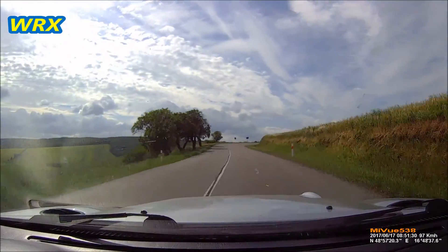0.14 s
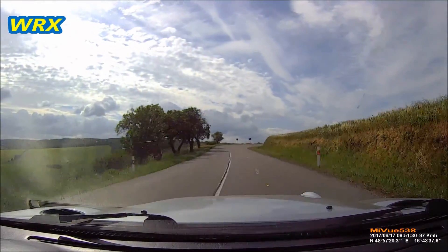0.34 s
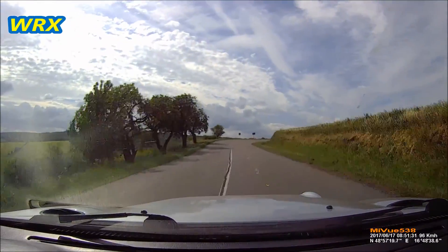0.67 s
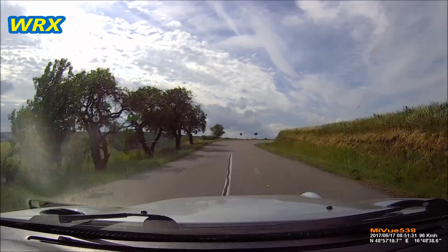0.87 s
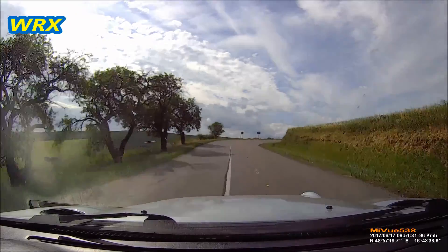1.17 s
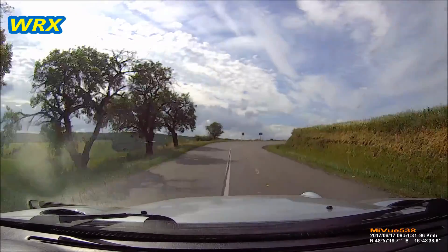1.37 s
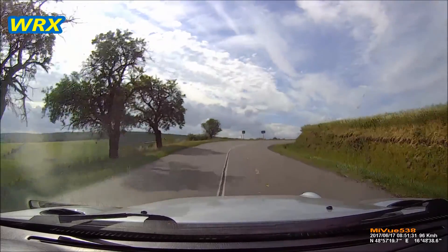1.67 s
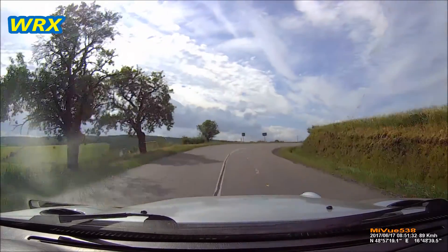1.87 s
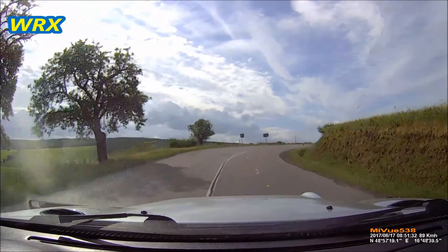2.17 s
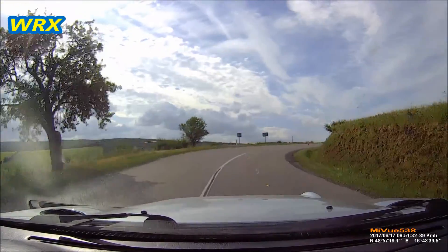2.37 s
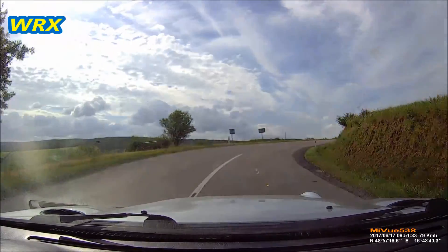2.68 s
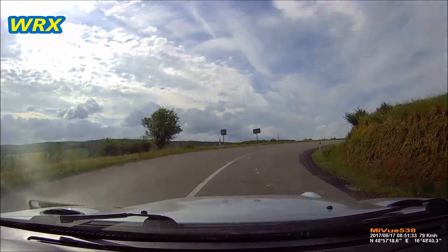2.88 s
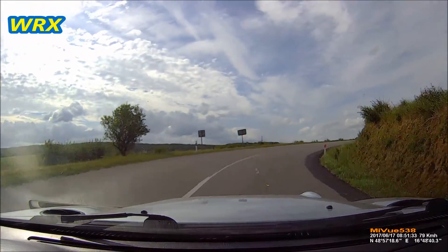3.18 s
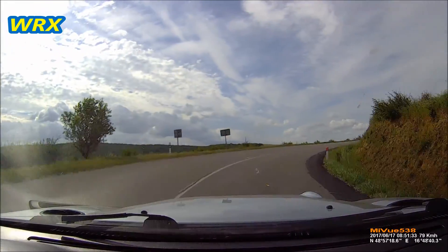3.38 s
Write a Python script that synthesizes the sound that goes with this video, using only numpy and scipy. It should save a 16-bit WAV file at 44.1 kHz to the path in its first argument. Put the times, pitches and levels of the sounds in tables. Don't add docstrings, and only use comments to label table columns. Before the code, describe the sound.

A car engine drones low inside a slowing cabin, with an early air hiss and trim rattles.

```python
import sys
import numpy as np
from scipy import signal
from scipy.fft import rfft, irfft, next_fast_len
from scipy.io import wavfile
from scipy.ndimage import uniform_filter1d, map_coordinates

SR = 44100
rng = np.random.default_rng(int(sys.argv[2]) if len(sys.argv) > 2 else 0)


def dump(signal):
    limited = np.clip(np.atleast_2d(signal).T, -1, 1)
    pcm = np.round(limited * 32767).astype(np.int16)
    wavfile.write(sys.argv[1], SR, pcm)


def natural_amplitude(level_db):
    exponent = np.asarray(level_db, float) / 20
    return 10 ** exponent


N = 156114


def unit(x):
    return x / np.sqrt(np.mean(x ** 2) + 1e-20)


def along(points, hz):
    f, v = np.transpose(points)
    return np.interp(np.log(hz + 1), np.log(f + 1), v)


def curves(rows):
    s, *cols = np.transpose(rows)
    return [np.interp(np.arange(N) / SR, s, c) for c in cols]


def wobble(rate):
    return map_coordinates(rng.standard_normal(1000), [np.arange(N) * rate / SR])


def filtered(x, response):
    m = next_fast_len(len(x) + 8192)
    return irfft(rfft(x, m) * response(np.fft.rfftfreq(m, 1 / SR)), m)[:len(x)]


def ringing(peaks, hz):
    return sum(natural_amplitude(db) * hz * w / np.hypot(c * c - hz * hz, hz * w + 1) for c, w, db in peaks)


def rush(response, patchy_db):
    z = signal.stft(rng.standard_normal(N + 512), nperseg=512)[2]
    field = rng.standard_normal(z.shape)
    field = uniform_filter1d(uniform_filter1d(field, 6, 0), 12, 1)
    patchy = signal.istft(z * natural_amplitude(patchy_db * unit(field)), nperseg=512)[1][:N]
    return unit(filtered(patchy, response))


def octave_band(f, hz, octaves):
    return np.exp(-np.log2((f + 1) / hz) ** 2 / octaves ** 2)


def road():
    # pitch_hz, level_db (per Hz)
    tyre_wind = [(250, -10), (330, -7.5), (550, -14.5), (900, -19.5), (2000, -31), (2900, -44), (4500, -50),
                 (7000, -55.5)]
    # pitch_hz, width_hz, level_db
    panels = [(286.6, 27, 1), (367.4, 18, 2.5), (553.6, 26, 2.5), (790, 30, 3), (1074, 27, -2.5),
              (2100, 800, -8.5), (6900, 610, 6)]
    # pitch_hz, level_db (per Hz)
    low_thrum = [(15, -16.5), (30, 0), (60, -7.5), (130, 0), (200, -10), (400, -20.5)]
    cancelled = [(336, 9.5, 0)]

    def body_response(hz):
        colour = natural_amplitude(along([(140, -42.5)] + tyre_wind + [(16500, -71.5)], hz))
        return colour * (1 + 0.78 * ringing(panels, hz)) * (1 - 0.6 * ringing(cancelled, hz))

    def thrum_response(hz):
        return natural_amplitude(along([(5, -61)] + low_thrum + [(900, -89.5)], hz))

    body = rush(body_response, patchy_db=-0.06)
    thrum = rush(thrum_response, patchy_db=-1.5)
    fade_db = -1.54 * (np.arange(N) / SR - 1.8)
    body_db = -32.5 + fade_db + 0.98 * wobble(3.715) + 0.22 * wobble(30.5)
    return natural_amplitude(body_db) * body + natural_amplitude(-29.5 + 0.36 * wobble(6)) * thrum


def trim_buzz():
    band = rush(lambda f: octave_band(f, 6900, 0.63), patchy_db=1.5)
    return natural_amplitude(-73 + 2.5 * wobble(45)) * band


def rattles():
    # start_s, peak_db
    clicks = [(0.6394, -52), (1.504, -40.5), (1.5654, -39), (1.7005, -50), (1.7692, -45), (1.8594, -46),
              (2.058, -42), (2.1658, -40), (2.175, -32), (2.3516, -37.5), (2.3715, -39.5), (2.4446, -37.5),
              (2.645, -43), (2.6534, -39), (2.8036, -37.5), (2.9757, -47), (3.1003, -29.5), (3.3762, -46)]
    # pitch_hz, width_octaves, t60_s
    colours = [(4500, 0.97, 0.021), (5000, 1.2, 0.041), (5600, 0.71, 0.021), (6000, .6, .05),
               (5900, 0.83, 0.13), (6200, 0.85, 0.11), (5000, 0.88, 0.025), (5600, 0.96, 0.019),
               (5600, .6, 0.019), (2332, 0.4, 0.047), (6700, .5, 0.045), (1898, 0.88, 0.031),
               (3600, 0.35, 0.034), (2980, 0.49, 0.064), (5170, 2.6, 0.028), (4320, 0.53, 0.033),
               (5100, .8, 0.051), (6600, 0.22, .07)]
    # start_s, peak_db
    linkage = [
        (2.8041, -40),
        (3.1002, -33),
    ]
    # pitch_hz, level_db, t60_s
    lever = [(2030, 0.5, 0.043), (2250, -7.5, .04), (4318, -12, .04), (4800, -9, 0.035), (6860, -7, 0.026)]
    # start_s, level_db, pitch_hz
    thumps = [
        (.19, -24, 290),
        (.22, -25, 200),
        (2.335, -22, 285),
        (2.65, -22, 370),
        (2.65, -28, 525),
        (3.10, -23, 303),
    ]
    out, t = np.zeros(N + SR), np.arange(SR // 5) / SR

    def add(start_s, sound):
        out[round(start_s * SR):][:len(t)] += sound

    for (s, db), (pitch_hz, octaves, t60_s) in zip(clicks, colours):
        def contact(f):
            return octave_band(f, pitch_hz, octaves) + natural_amplitude(-13.5) * (f > 1200)

        burst = unit(filtered(rng.standard_normal(len(t)), contact))
        hard = db > -40
        decay = natural_amplitude(-60 * t / t60_s) + hard * natural_amplitude(1.5 - 60 * t / 0.007)
        rise = 1 - np.exp(-t / (0.0003 if hard else 0.003))
        add(s, natural_amplitude(db - 7) * decay * burst * rise)
    for s, db in linkage:
        ring = np.zeros(len(t))
        for hz, level_db, t60_s in lever:
            struck_db = level_db + rng.normal(0, 1.5)
            ring += natural_amplitude(struck_db - 60 * t / t60_s) * np.sin(2 * np.pi * hz * t)
        add(s, natural_amplitude(db + 1.5) * ring)
    for s, db, hz in thumps:
        swell = natural_amplitude(db - 60 * t / 0.2) * (1 - np.exp(-t / 0.012))
        add(s, swell * np.sin(2 * np.pi * hz * t))
    return out[:N]


def mount():
    # start_s, peak_db
    ticks = [
        (1.6289, -43),
        (3.091, -53.5),
    ]
    out = np.zeros(N)
    for s, db in ticks:
        out[round(s * SR):][:2] += natural_amplitude(db + 10.5) * np.array([1, -1])
    return out


def gearbox():
    # time_s, pitch_hz, level_db
    hum = [(2.2, 352.6, -45), (2.6, 330, -41.5), (2.9, 317.3, -38.5), (3.15, 294, -43), (3.54, 282, -42)]
    hz, db = curves(hum)
    phase = 2 * np.pi * np.cumsum(hz) / SR + 0.49 * wobble(17)
    return np.sqrt(2) * natural_amplitude(db + 2.3 * wobble(18)) * np.sin(phase)


def boost_air():
    # time_s, pressure_db
    pressure = [(0, -28.5), (.12, -30), (.33, -35), (.4, -36.5), (.82, -42.5), (1.5, -49), (2.2, -51.5),
                (3.2, -70), (3.54, -56)]
    # pitch_hz, level_db (per Hz)
    hiss = [(700, -18.5), (1300, -7.5), (1700, -7), (2100, -5.5), (2700, -8.5), (4400, -15), (6900, -18.5),
            (9000, -32)]
    # pitch_hz, width_hz, level_db
    duct = [(1620, 30, -3), (1725, 32, 0), (2015, 60, 4.5), (2200, 35, -2), (2280, 20, -1), (2490, 40, -4),
            (2783, 28, -1), (3078, 35, -2), (3315, 28, 0), (4197, 25, 1)]
    low_split_hz, top_split_hz = 2600, 8300

    def colour(hz):
        return natural_amplitude(along([(300, -70.5)] + hiss + [(16000, -40)], hz)) * (1 + 2.1 * ringing(duct, hz))

    def above(hz, edge_hz):
        return hz ** 4 / (hz ** 4 + edge_hz ** 4)

    def middle(hz):
        return above(hz, low_split_hz) * (1 - above(hz, top_split_hz) ** 2)

    low = rush(lambda hz: colour(hz) * (1 - above(hz, low_split_hz)), patchy_db=0.27)
    high = rush(lambda hz: colour(hz) * middle(hz), patchy_db=0.25)
    top = rush(lambda hz: colour(hz) * above(hz, top_split_hz) ** 2, patchy_db=1.3)
    db, = curves(pressure)
    drop_db = db - db.max()
    layers = natural_amplitude(drop_db) * low
    layers += natural_amplitude(-2 + 1.26 * drop_db) * high
    layers += natural_amplitude(-25 + 0.77 * drop_db) * top
    return natural_amplitude(db.max() - 3 + 0.63 * wobble(60)) * layers


def engine():
    # time_s, firing_hz, load_db, bark_db (lift of the upper orders)
    drive = [(0, 112.9, -20, 8), (.14, 109, -24.5, 1), (.25, 109.1, -15.5, 2.5), (.62, 108.1, -15, -14.5),
             (.74, 107.5, -16, 1), (.9, 106.4, -16, -2), (1.05, 104.7, -18, 0), (1.53, 99.5, -20, -1),
             (2.2, 93.27, -18.5, -1.5), (2.37, 85.5, -22.5, 1.5), (2.5, 80.55, -18, -5.5),
             (2.63, 72.43, -23.5, -5), (2.8, 64.8, -21, -0.5), (3.12, 51.4, -27.5, .5),
             (3.31, 64.16, -16, -2.5), (3.4, 74, -23.5, -8.5), (3.48, 83.4, -21, 2.5),
             (3.54, 90.1, -18.5, 3.5)]
    # pitch_hz, gain_db
    pipe = [(40, -12), (62, -12), (82, -2.5), (110, 0.5), (135, 3), (170, -11), (220, -17.5), (400, -22)]
    # multiple_of_firing_rate, level_db, unsteadiness_db
    firing = [(.5, -18, 4), (1, 0, .7), (1.5, -19, 3), (2.01, -3, .8), (2.5, -17, 4), (3.01, -13, 4),
              (4.5, -6, 2.5)]
    unsteady_per_s = 22
    hz, load_db, bark_db = curves(drive)
    hz = uniform_filter1d(hz, 2000)
    turn = 2 * np.pi * np.cumsum(hz) / SR + 0.04 * wobble(unsteady_per_s)
    out = np.zeros(N)
    for multiple, level_db, sway_db in firing:
        order = round(2 * multiple) / 2
        db = load_db + level_db + sway_db * wobble(unsteady_per_s) + along(pipe, order * hz)
        if 2 <= round(order) < 4:
            db = db + bark_db
        if order > 4:
            db = db + 1.3 * (load_db - load_db.max())
        out += np.sqrt(2) * natural_amplitude(db) * np.sin(order * turn + 2 * np.pi * rng.random())
    return out


def scene():
    def port(hz):
        return natural_amplitude(-16 * hz ** 14 / (hz ** 14 + 8030 ** 14))

    behind_port = filtered(road() + trim_buzz() + rattles(), port)
    return (behind_port + mount() + gearbox() + boost_air() + engine())[None]


def top_cut(x):
    return signal.sosfilt(signal.butter(12, 15830, fs=SR, output="sos"), x)


def record(dry):
    # pitch_hz, level_db
    self_slope = [(8000, 1), (14800, 0.5), (15300, -3), (15800, -13.5)]
    hiss = filtered(rng.standard_normal(N), lambda hz: natural_amplitude(-70.5 + along(self_slope, hz)))
    return top_cut(dry + hiss)


dry = scene()
out = record(dry)
dump(out)
```